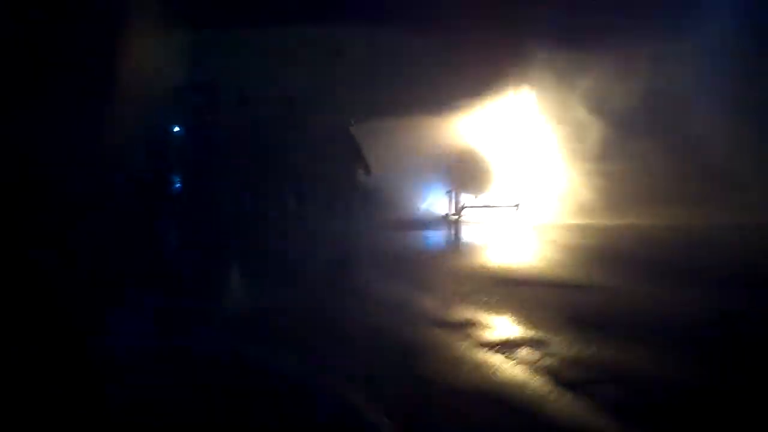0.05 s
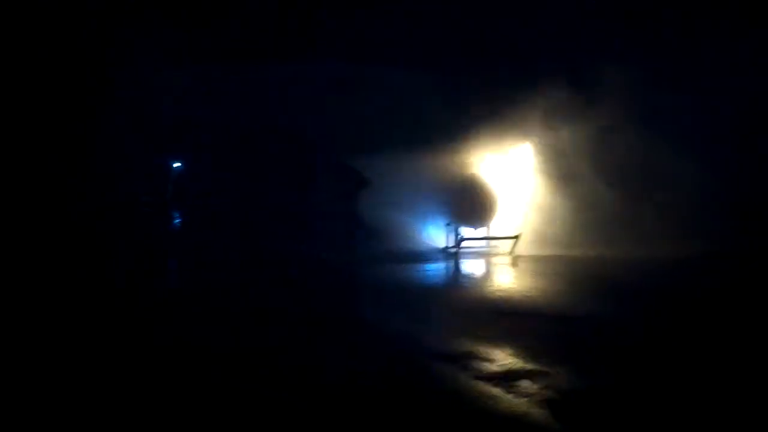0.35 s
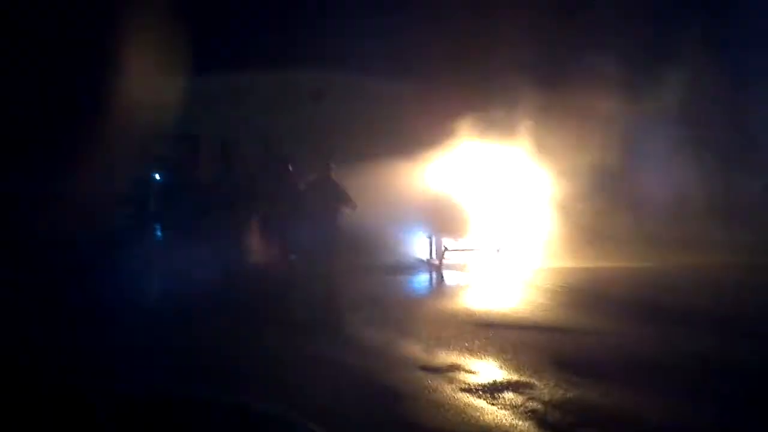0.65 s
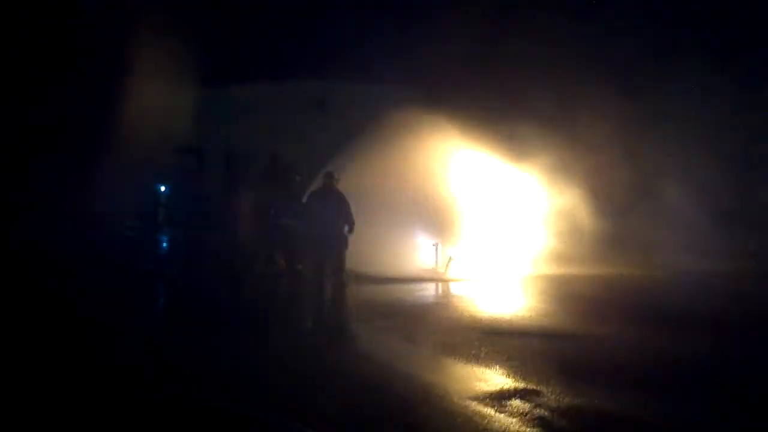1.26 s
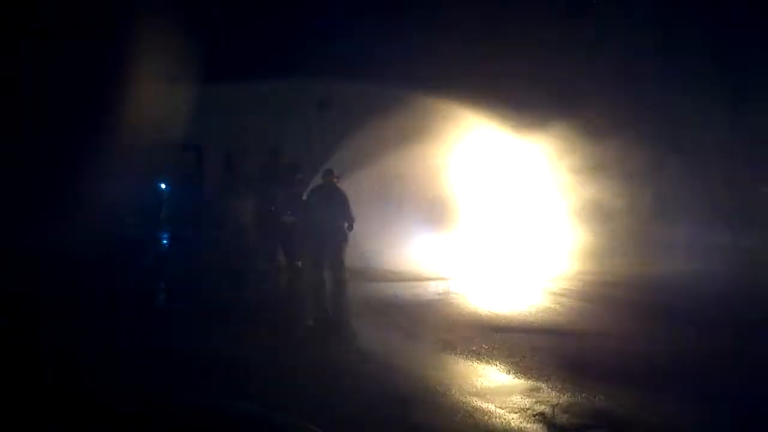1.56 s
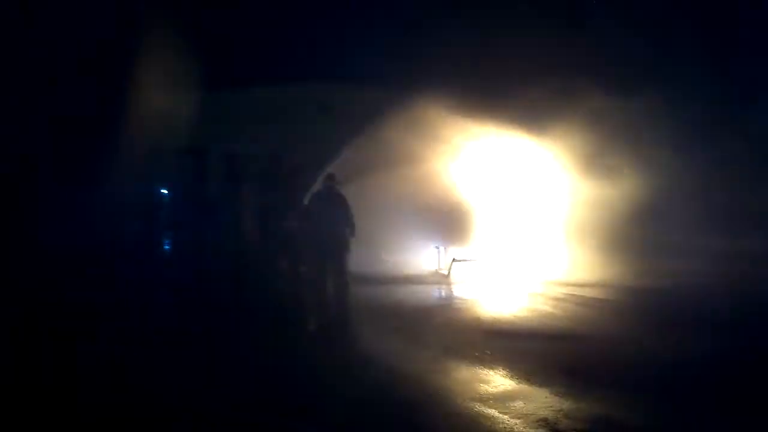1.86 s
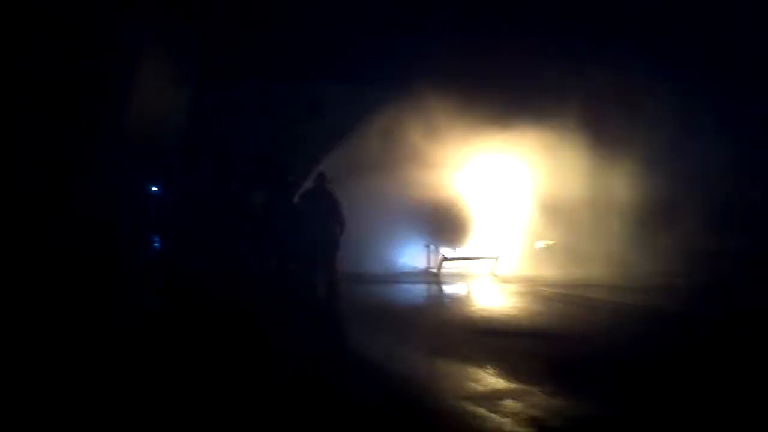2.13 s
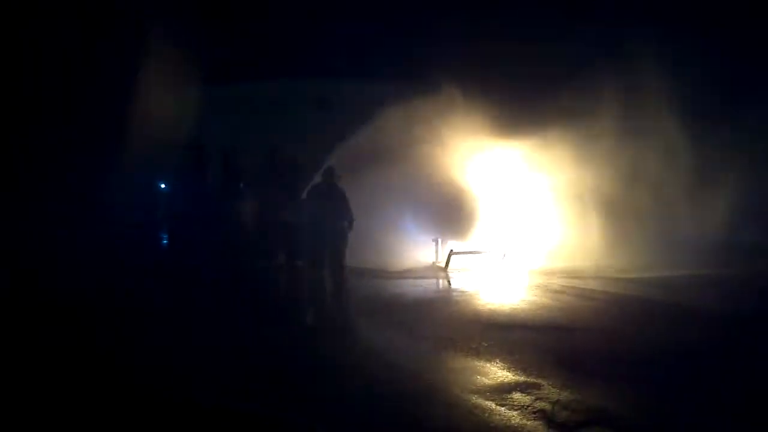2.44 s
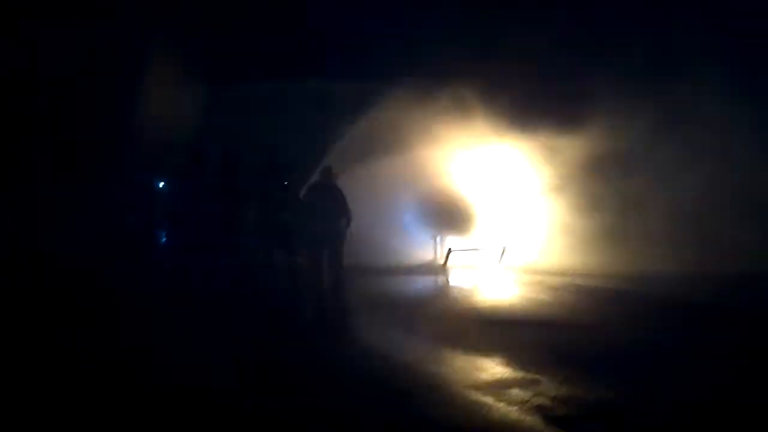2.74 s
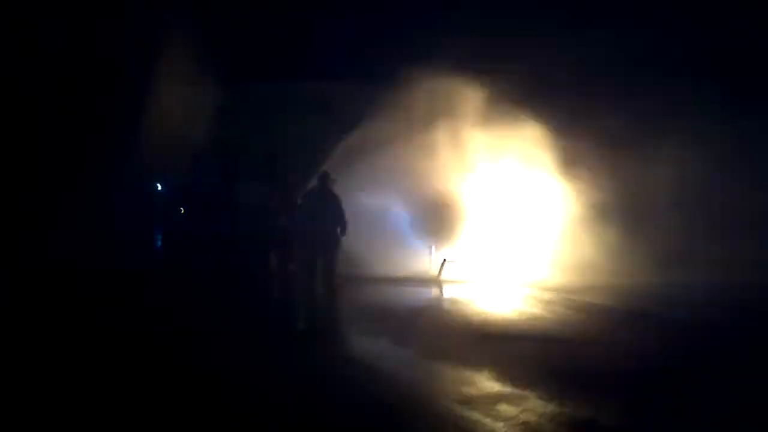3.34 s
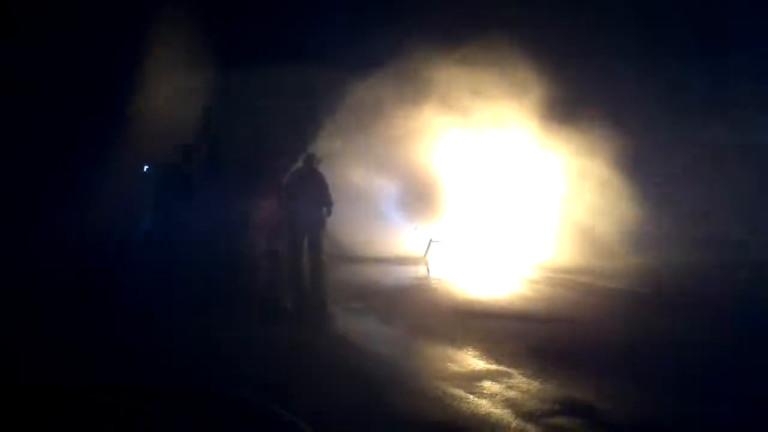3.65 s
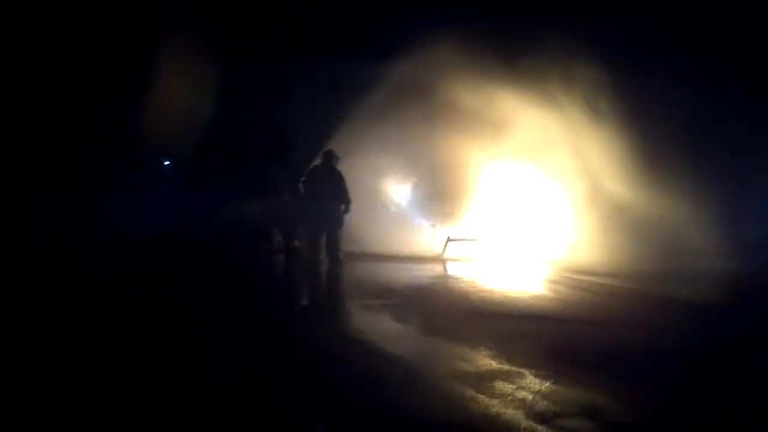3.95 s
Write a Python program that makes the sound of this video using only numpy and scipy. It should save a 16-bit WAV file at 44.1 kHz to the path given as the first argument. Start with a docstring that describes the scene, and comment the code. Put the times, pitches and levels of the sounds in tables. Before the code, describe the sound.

A large gas fire roars steadily outdoors, with a high, surging hiss and rush of escaping gas throughout. The flames flare in low, flapping bursts around 0.4 and 1 second, then thump hard near 1.5 and 2.6 seconds. The hiss eases at about 2.8 seconds, and a dense run of flaps and thumps follows from 3 to 3.5. The hiss rises again with another thumping flare near 3.9 seconds.

```python
"""A surging hiss and a rushing midrange sound over a steady roar, with low, flapping bursts and hard thumps:
a propane tank burns outdoors at night while a hose sprays it. The turbulent jet of escaping gas gives
the hiss and rush, turbulent combustion the roar, and the flaring flames short pressure pulses.
The sound reaches the left microphone port first, and the right port has reversed polarity."""
import sys
import numpy as np
from scipy import signal
from scipy.fft import rfft, irfft, next_fast_len
from scipy.io import wavfile
from scipy.ndimage import uniform_filter1d, map_coordinates

SR = 44100
rng = np.random.default_rng(int(sys.argv[2]) if len(sys.argv) > 2 else 0)


def digitize_waveform(pressure):
    """Quantize a signal to 16-bit integers and store it at the path in sys.argv[1].

    Rows of a 2-D input are taken as channels; values are limited to [-1, 1].
    """
    field = np.atleast_2d(pressure).T
    bounded = np.clip(field, -1, 1)
    quanta = np.round(bounded * 32767).astype(np.int16)
    wavfile.write(sys.argv[1], SR, quanta)


N = 176400

# envelopes of the steady sources: t/s, relative level/dB
HISS_ENVELOPE = [(0.0, -23.5), (0.07, -33), (0.11, -32), (0.24, -24), (0.3, -27.5), (0.36, -29),
                 (0.39, -25), (0.42, -29), (0.46, -27), (0.49, -31), (0.54, -23.5), (0.6, -29.5),
                 (0.79, -31.5), (0.83, -25.5), (1.04, -26), (1.37, -31.5), (1.66, -29.5), (1.71, -29.5),
                 (1.84, -26.5), (1.93, -31), (2.13, -25), (2.2, -24.5), (2.3, -25.5), (2.378, -24.5),
                 (2.395, -30.3), (2.54, -30.5), (2.6, -25), (2.66, -28.5), (2.78, -26.5), (2.805, -25),
                 (2.82, -31), (3.66, -33.5), (3.72, -31), (3.81, -28.5), (3.85, -29.5), (3.95, -27.5),
                 (3.98, -26)]
RUSH_ENVELOPE = [(0, -29.5), (.07, -37.5), (.12, -31.5), (.23, -27.5), (.36, -29), (.62, -31), (.76, -36),
                 (.84, -30), (.97, -30), (1.03, -28.5), (1.08, -33.5), (1.28, -34.5), (1.34, -37),
                 (1.66, -35), (1.79, -31), (1.86, -36.5), (2.24, -32), (2.33, -30.5), (2.37, -36),
                 (2.52, -39), (2.57, -33.5), (2.78, -34.5), (2.84, -37.5), (3.35, -39), (3.65, -38.5),
                 (3.77, -36), (4, -37.5)]
ROAR_ENVELOPE = [(0, -29), (.45, -27.5), (.85, -28), (1.1, -30.5), (1.4, -29.5), (1.75, -27), (2.1, -28),
                 (2.42, -31), (2.8, -31), (3.2, -30), (3.45, -31), (3.7, -30), (4, -31)]
# Gaussian flare-ups of the flame: t/s, standard deviation/s, relative level/dB
FLARE_UPS = [(.44, 0.039, -21.5), (.57, 0.022, -24), (.78, 0.028, -27), (.87, 0.022, -25),
             (.99, 0.023, -17), (1.28, 0.018, -24), (1.41, .04, -24), (1.54, 0.022, -15.5),
             (1.68, 0.075, -28), (1.8, 0.011, -19), (1.93, 0.05, -34), (2.05, 0.013, -19.5),
             (2.2, 0.018, -28), (2.35, .03, -28), (2.53, 0.022, -19), (2.645, 0.014, -19),
             (2.71, 0.013, -23), (2.78, .016, -21), (2.93, 0.049, -22), (3.09, 0.047, -15.5),
             (3.235, 0.033, -20.5), (3.3, 0.015, -16), (3.45, 0.1, -19.5), (3.73, 0.12, -28),
             (3.939, 0.071, -16)]
# hard thumps of the flame: t/s, peak level/dB, nominal f/Hz
FLAME_THUMPS = [(1.276, -17, 330), (1.528, -11.5, 280), (2.644, -8, 169), (2.778, -21, 200),
                (3.091, -21, 220), (3.224, -18, 220), (3.231, -6.5, 186), (3.301, -11.5, 300),
                (3.327, -15.5, 338), (3.416, -15, 350), (3.43, -12, 418), (3.445, -12.5, 420),
                (3.4715, -9.5, 530), (3.509, -19, 400), (3.527, -12, 280), (3.913, -16, 330),
                (3.950, -14, 280)]
# spectral densities: f/Hz, relative level/dB
HISS_SPECTRUM = [(1500, -37), (2600, -23.5), (3300, -13), (4600, -19), (5300, -22.5), (6200, -18.5),
                 (6900, -3), (7600, -1), (8600, 1), (9600, -2.5), (10800, -17), (11500, -23), (13000, -17),
                 (15500, -19.5)]
RUSH_SPECTRUM = [(500, -21), (680, -3), (1000, -5.5), (1300, -1.5), (1520, -5), (1950, -1.5), (2700, -1.5),
                 (3100, -34), (4500, -10.5), (7000, -37)]
RUMBLE_SPECTRUM = [(25, -25), (50, -21), (70, -20), (90, -1), (130, 7), (220, -2.5), (380, -4.5),
                   (600, -21.5), (1100, -28.5), (2500, -66)]
ROAR_SPECTRUM = [(25, -11), (50, -26), (70, -21), (90, -5), (125, -4.5), (180, -1.5), (230, -1.5),
                 (310, -.5), (420, -2.5), (540, -7.5), (880, -9), (1200, -16), (2200, -63)]
FIREBALL_SPECTRUM = [(150, -26), (260, -5), (330, -3), (395, 2), (520, -28), (1200, -70)]
# hollow resonances: f/Hz, bandwidth/Hz, gain/dB
RUSH_RESONANCES = [(874, 79, 7.5), (1130, 100, 6.5), (1767, 250, 5.5)]
ROAR_RESONANCES = [(114, 12.5, 4), (175.8, 12, 6.5), (248, 20, 4.5), (310, 26, 3), (382, 31, 3.5)]
# level difference between the ports: f/Hz, left minus right/dB
RUSH_BALANCE = [(900, 2.5), (1400, 0.5), (1800, -0.5), (2600, -0.5)]
ROAR_BALANCE = [(90, -4), (260, 4), (490, 10), (780, 8.5), (1100, 10.5)]
# phase lead of the left port (for the rush, added to that of the delay): f/Hz, phase/rad
RUSH_EXTRA_PHASE = [(880, 1), (1150, 0.11), (1480, 0.46), (1900, -0.017), (2900, -0.049)]
ROAR_PHASE = [(90, 0.69), (260, 2.2), (430, 1.98), (600, 2), (850, 4.2), (1500, 2.5)]
# likeness of the roar at the two ports: f/Hz, coherence (clipped to 0-0.995 in use)
ROAR_COHERENCE = [(90, -0.13), (300, 1), (480, 1), (800, 1.5)]

SIDES = np.array([[.5], [-.5]])  # left and right share of a difference between the ports
JET_LAG_S, FLAME_LAG_S = .000339, .00036  # delay of the right port
HISS_GAIN_DB, RUSH_GAIN_DB, RUMBLE_GAIN_DB, FLARE_FLOOR_DB = 4, 1.5, -5, -31.5
PUFF_COUNT, PUFF_HZ, PUFF_SPREAD_OCTAVES, PUFF_GAIN_DB, PUFF_SPREAD_DB = 320, 238, 0.65, -3.5, 1.5
PULSE_CYCLES = 0.61  # sets pulse length; the spectrum peaks at nominal f / (2 * PULSE_CYCLES)
FIREBALL_S, FIREBALL_SIGMA_S, FIREBALL_DB = 2.02, 0.14, -34
LOW_CUT_HZ, TOP_HZ = 58, 15750


def gas_jet():
    """Jet noise: turbulence in the escaping gas gives a hiss and a hollow rush that flutter together."""
    flutter = wobble(45)
    lead = lambda hz: 2 * np.pi * hz * JET_LAG_S
    grainy = turbulence(patchy_db=1.9) * amp(0.35 * wobble(1400))
    hiss = ports(grainy, HISS_SPECTRUM, lead, balance_db=lambda hz: -.2)
    hollow = resonant(turbulence(patchy_db=1.45) * amp(0.67 * wobble(700)), RUSH_RESONANCES)
    rush = ports(hollow, RUSH_SPECTRUM, lead=lambda hz: lead(hz) + along(RUSH_EXTRA_PHASE, hz),
                 balance_db=lambda hz: along(RUSH_BALANCE, hz))
    hiss_db = curve(HISS_ENVELOPE) + HISS_GAIN_DB + 1.2 * flutter + 0.48 * wobble(130)
    rush_db = curve(RUSH_ENVELOPE) + RUSH_GAIN_DB + 0.93 * flutter
    return hiss * amp(hiss_db) + rush * amp(rush_db)


def flares():
    """Amplitude modulation: flare-ups, adding in power, swell a low rumble and irregular small puffs."""
    power = amp(FLARE_FLOOR_DB) ** 2
    power += sum((amp(db) * gaussian(s, sigma)) ** 2 for s, sigma, db in FLARE_UPS)
    noise = turbulence(patchy_db=1.0) * amp(1.2 * wobble(160))
    rumble = ports(noise, RUMBLE_SPECTRUM, lead=lambda hz: 2 * np.pi * hz * FLAME_LAG_S)
    jitter, strength, pitch = rng.standard_normal(size=(PUFF_COUNT, 3)).T
    times = np.clip((np.arange(PUFF_COUNT) + .5 * jitter) / PUFF_COUNT, 0, 1) * N / SR
    puff_db = PUFF_GAIN_DB + PUFF_SPREAD_DB * strength
    puff_hz = PUFF_HZ * 2 ** (PUFF_SPREAD_OCTAVES * pitch)
    flapping = pressure_pulses(zip(times, puff_db, puff_hz))
    return (rumble * amp(RUMBLE_GAIN_DB) + flapping) * np.sqrt(power)


def pressure_pulses(rows, balance_db=0):
    """Compression, then rarefaction: a Gaussian derivative for each row of t/s, level/dB, nominal f/Hz."""
    t = np.arange(N) / SR + SIDES * FLAME_LAG_S
    pressure = np.zeros((2, N))
    for s, db, hz in rows:
        near = slice(max(int(s * SR) - 1024, 0), int(s * SR) + 1024)
        scaled_time = (t[:, near] - s) * hz * np.pi / PULSE_CYCLES
        pressure[:, near] -= amp(db) * scaled_time * np.exp((1 - scaled_time ** 2) / 2)
    return pressure * amp(SIDES * balance_db)


def roar():
    """Combustion noise: burning gas roars steadily, and a narrower band swells as a fireball rises."""
    def combustion(spectrum):
        hollow = resonant(turbulence(patchy_db=0.36), ROAR_RESONANCES)
        return ports(hollow, spectrum, lead=lambda hz: along(ROAR_PHASE, hz),
                     balance_db=lambda hz: along(ROAR_BALANCE, hz),
                     coherence=lambda hz: along(ROAR_COHERENCE, hz))
    steady = combustion(ROAR_SPECTRUM) * amp(curve(ROAR_ENVELOPE) + 0.81 * wobble(60))
    fireball = combustion(FIREBALL_SPECTRUM) * amp(FIREBALL_DB) * gaussian(FIREBALL_S, FIREBALL_SIGMA_S)
    return steady + fireball


def turbulence(patchy_db):
    """Intermittency: two independent noises with patches of random gain in time and frequency."""
    spectra = signal.stft(rng.standard_normal((2, N)), nperseg=512)[2]
    patches = uniform_filter1d(rng.standard_normal(spectra.shape[1:]), size=5, axis=0)
    patches = uniform_filter1d(patches, size=14, axis=1)
    return signal.istft(spectra * amp(patchy_db * unit(patches)), nperseg=512)[1][:, :N]


def resonant(x, peaks):
    """Resonance: each peak lifts the spectrum of x by a Lorentzian curve in decibels."""
    def lift_db(hz):
        return sum(db / (1 + (2 * (hz - centre) / width) ** 2) for centre, width, db in peaks)
    return filtered(x, lambda hz: amp(lift_db(hz)))


def ports(pair, spectrum, lead, balance_db=lambda hz: 0, coherence=lambda hz: 1):
    """Partial coherence: sum and difference of two shaped noises feed the two ports, at joint rms 1."""
    def shares(hz):
        angle = np.arccos(np.clip(coherence(hz), 0, .995)) * np.ones_like(hz) / 2
        return amp(along(spectrum, hz)) * np.array([np.cos(angle), np.sin(angle)])
    common, apart = filtered(pair, shares)
    left_right = np.array([common + apart, common - apart])
    return unit(filtered(left_right, lambda hz: amp(SIDES * balance_db(hz)) * np.exp(1j * SIDES * lead(hz))))


def filtered(x, response):
    """Linear filtering: the spectrum of x times a complex frequency response."""
    size = next_fast_len(N + 8192)
    return irfft(rfft(x, size) * response(np.fft.rfftfreq(size, 1 / SR)), size)[..., :N]


def wobble(rate):
    """Random modulation: a spline through rate knots a second."""
    return map_coordinates(rng.standard_normal(8192), [np.arange(N) * rate / SR], mode="wrap")


def gaussian(centre_s, sigma_s):
    """Gaussian envelope of height 1."""
    return np.exp(-.5 * ((np.arange(N) / SR - centre_s) / sigma_s) ** 2)


def curve(rows):
    """Linear interpolation of t/s, value rows at every sample."""
    return np.interp(np.arange(N) / SR, *np.transpose(rows))


def along(rows, hz):
    """Interpolation of f/Hz, value rows on a logarithmic frequency axis."""
    f, value = np.transpose(rows)
    return np.interp(np.log(hz + 1), np.log(f + 1), value)


def amp(db):
    """Amplitude ratio of a level in decibels."""
    return 10 ** (np.asarray(db) / 20)


def unit(x):
    """Normalisation to rms 1."""
    return x / np.sqrt(np.mean(x ** 2) + 1e-20)


def scene():
    """Superposition: jet, roar, flare-ups and thumps add at the two ports."""
    return gas_jet() + roar() + flares() + pressure_pulses(FLAME_THUMPS, balance_db=-1.5)


def record(dry):
    """Polarity reversal and band limiting: the right channel is inverted, deep bass and top are cut."""
    low_cut = lambda hz: (hz / LOW_CUT_HZ) ** 3 / np.sqrt(1 + (hz / LOW_CUT_HZ) ** 6)
    return filtered(dry * np.array([[1], [-1]]), lambda hz: low_cut(hz) * (hz < TOP_HZ))


dry = scene()
out = record(dry)
digitize_waveform(out)
```